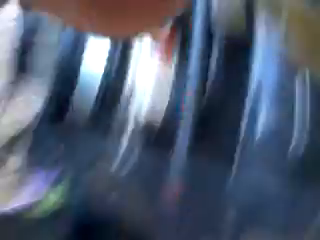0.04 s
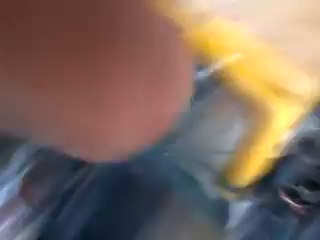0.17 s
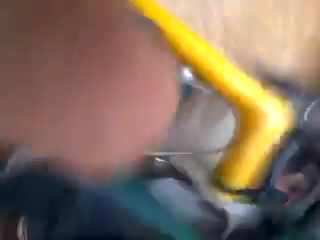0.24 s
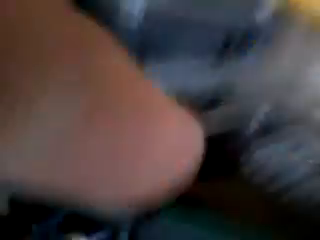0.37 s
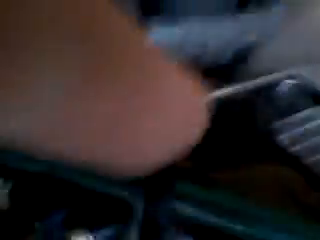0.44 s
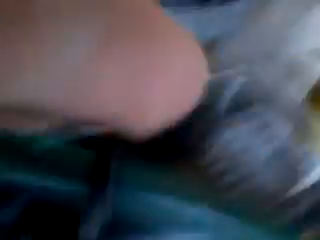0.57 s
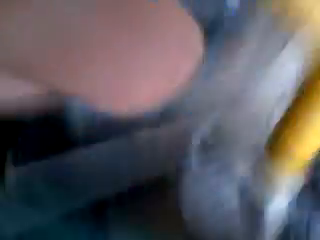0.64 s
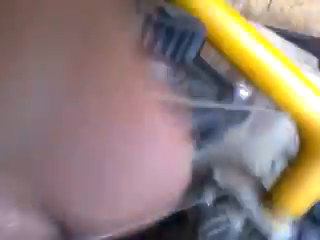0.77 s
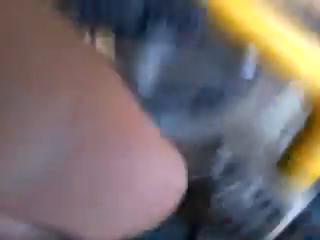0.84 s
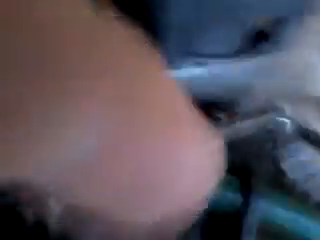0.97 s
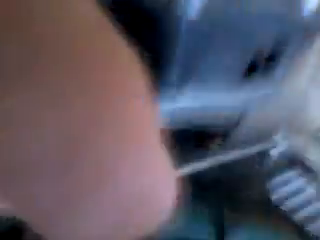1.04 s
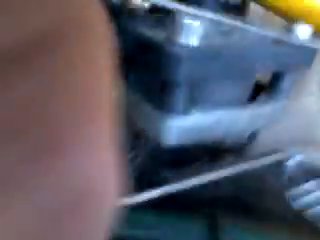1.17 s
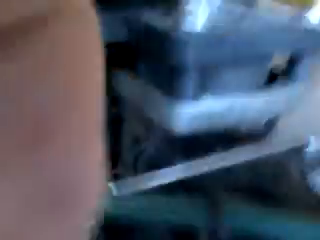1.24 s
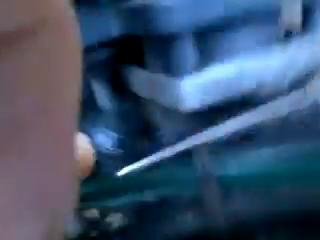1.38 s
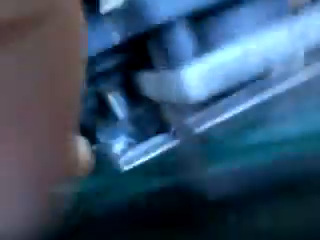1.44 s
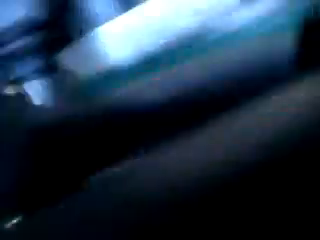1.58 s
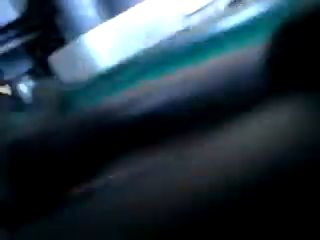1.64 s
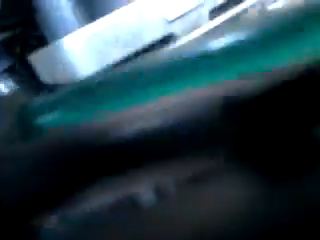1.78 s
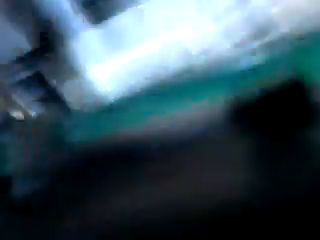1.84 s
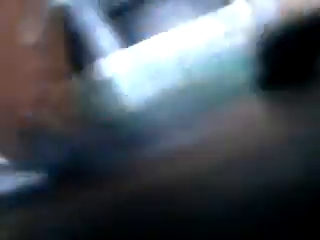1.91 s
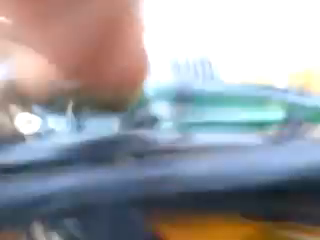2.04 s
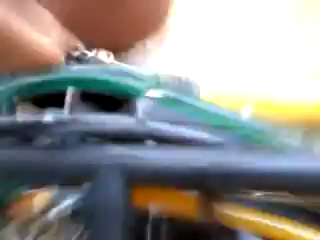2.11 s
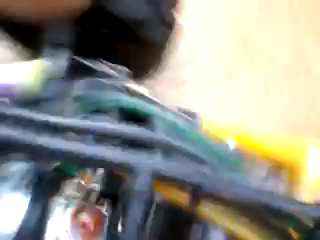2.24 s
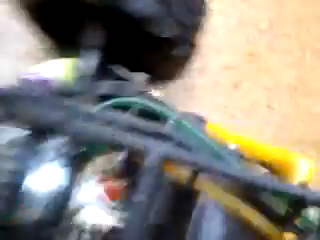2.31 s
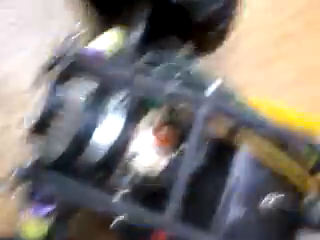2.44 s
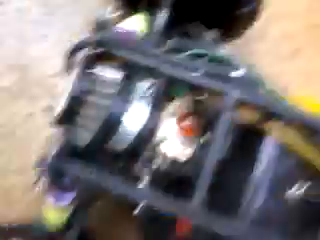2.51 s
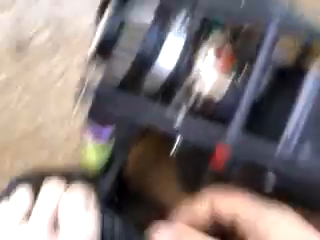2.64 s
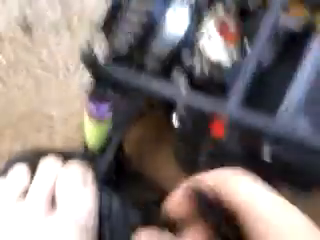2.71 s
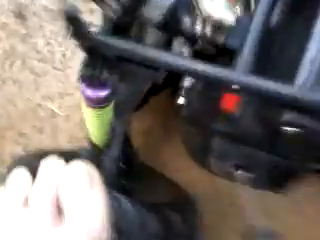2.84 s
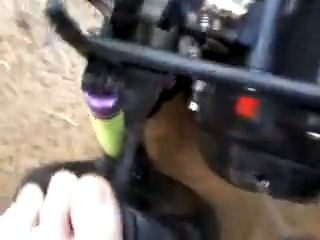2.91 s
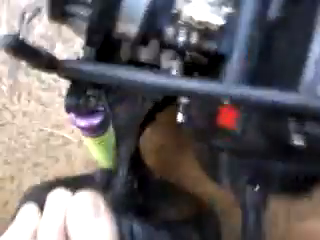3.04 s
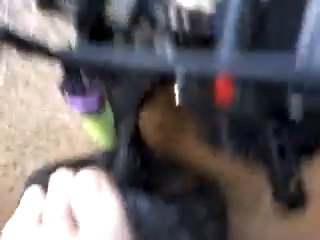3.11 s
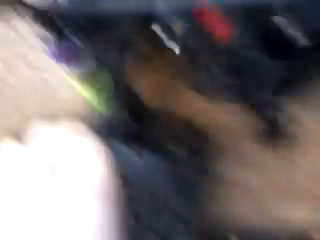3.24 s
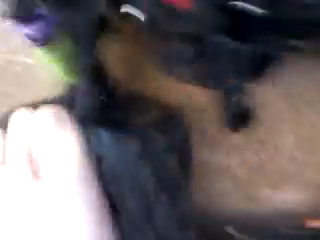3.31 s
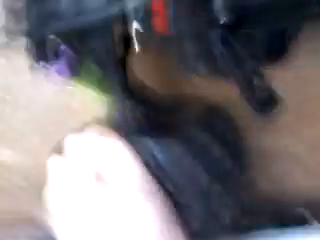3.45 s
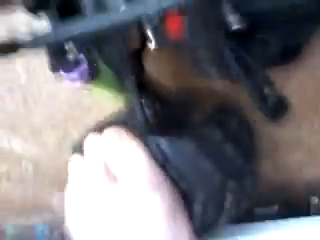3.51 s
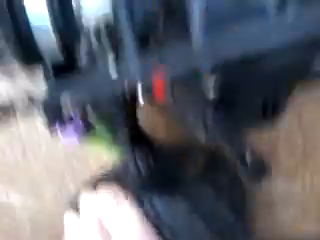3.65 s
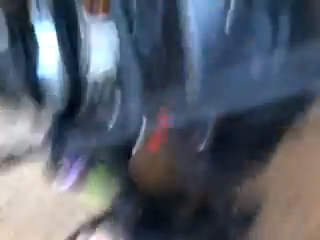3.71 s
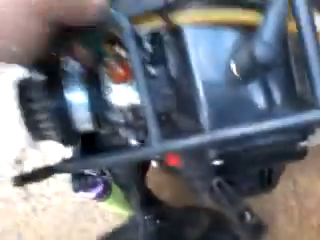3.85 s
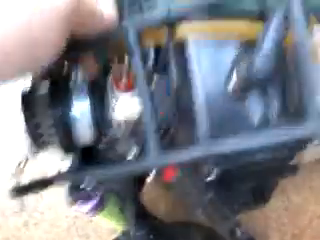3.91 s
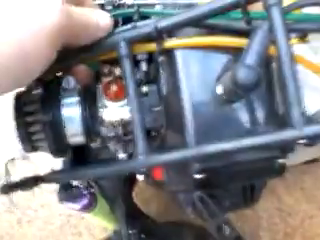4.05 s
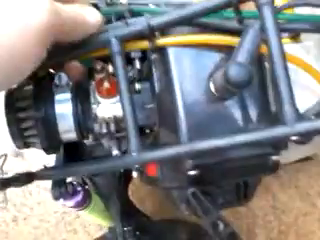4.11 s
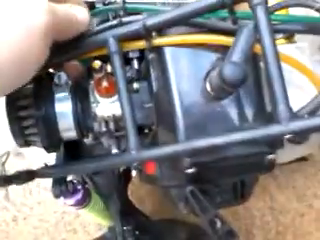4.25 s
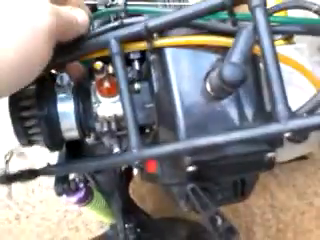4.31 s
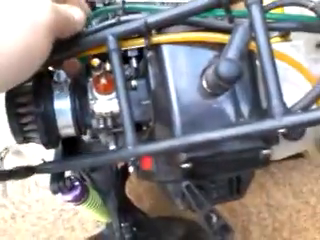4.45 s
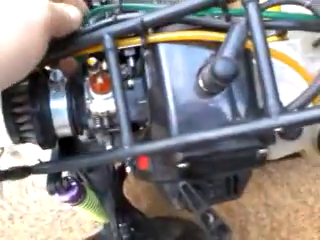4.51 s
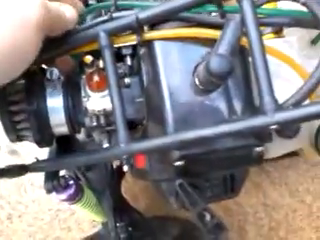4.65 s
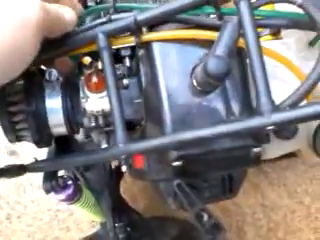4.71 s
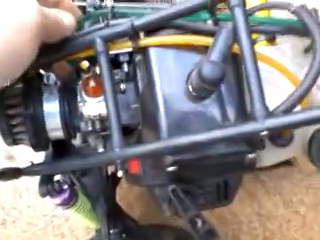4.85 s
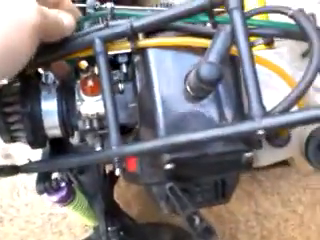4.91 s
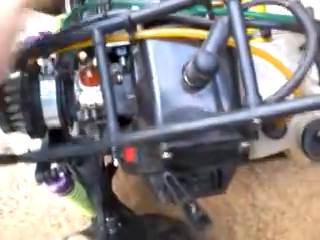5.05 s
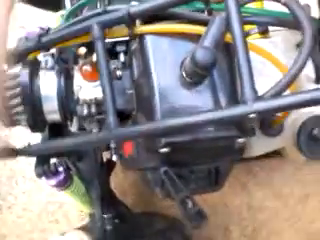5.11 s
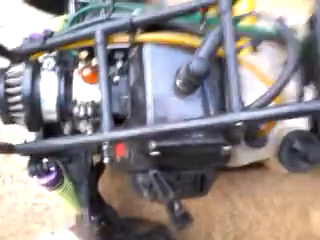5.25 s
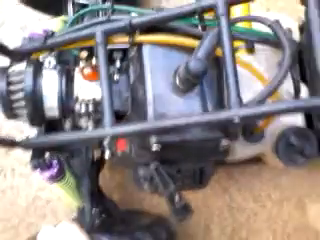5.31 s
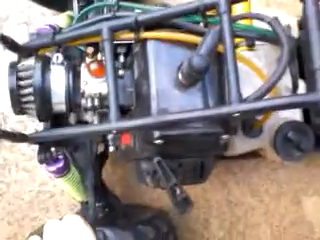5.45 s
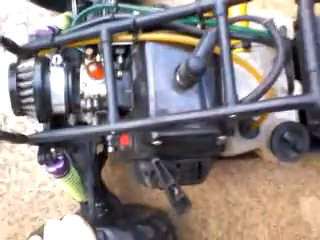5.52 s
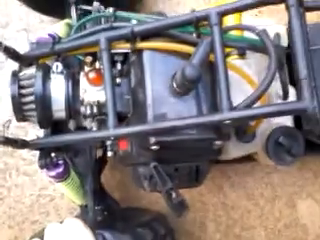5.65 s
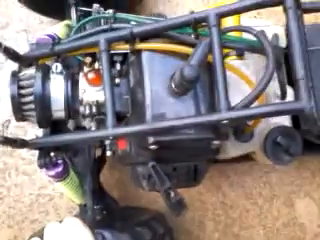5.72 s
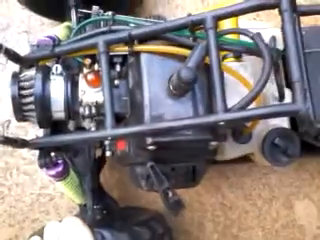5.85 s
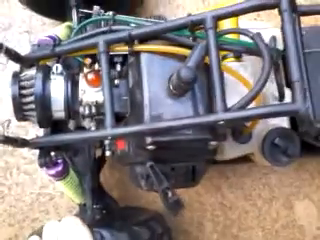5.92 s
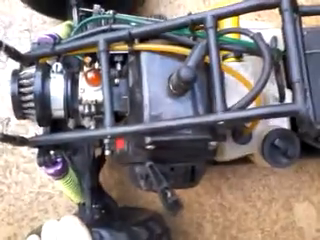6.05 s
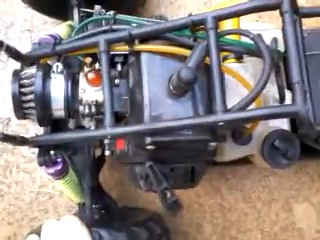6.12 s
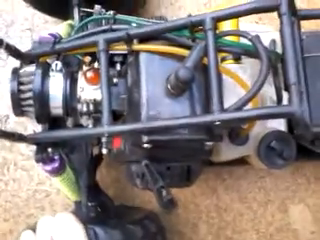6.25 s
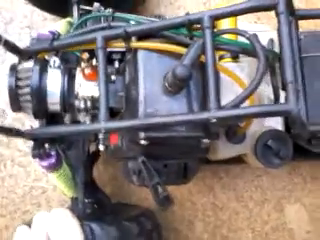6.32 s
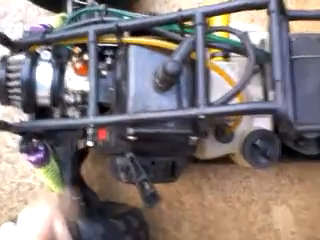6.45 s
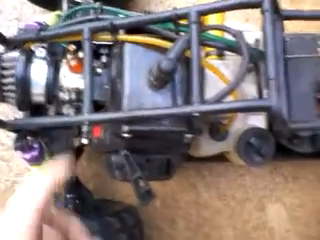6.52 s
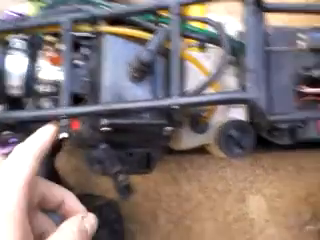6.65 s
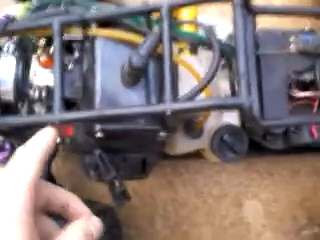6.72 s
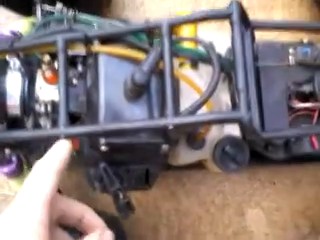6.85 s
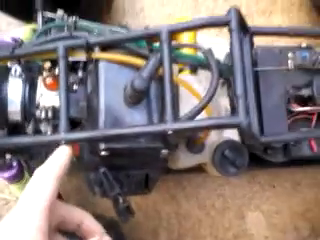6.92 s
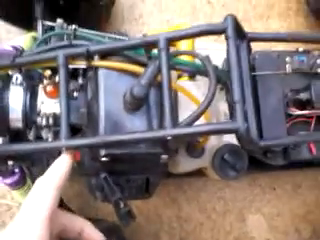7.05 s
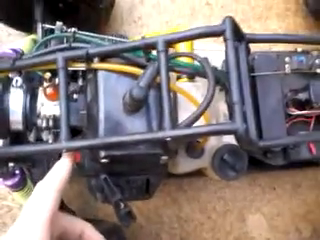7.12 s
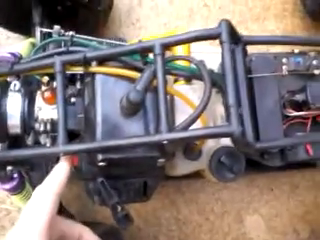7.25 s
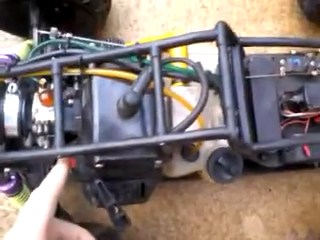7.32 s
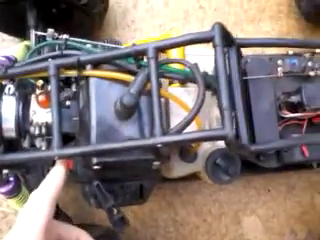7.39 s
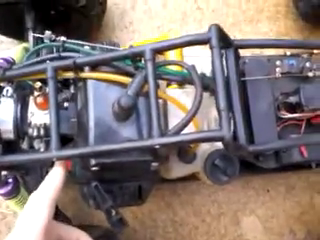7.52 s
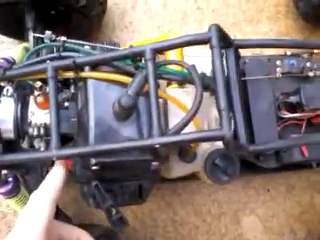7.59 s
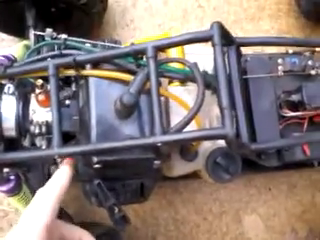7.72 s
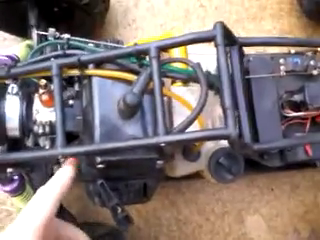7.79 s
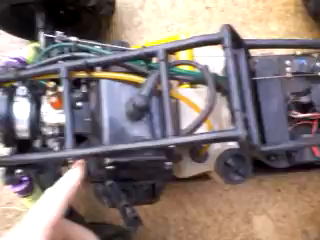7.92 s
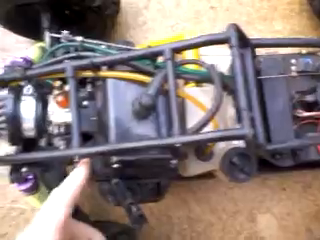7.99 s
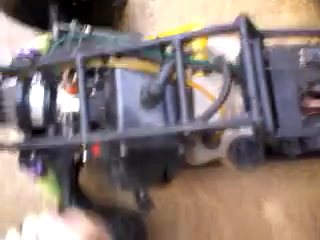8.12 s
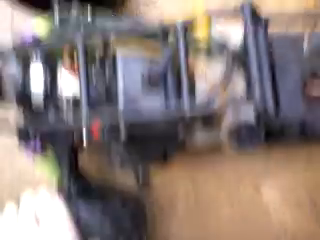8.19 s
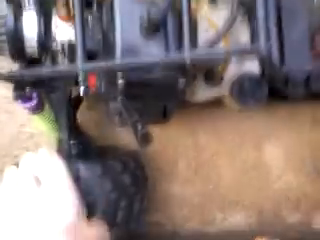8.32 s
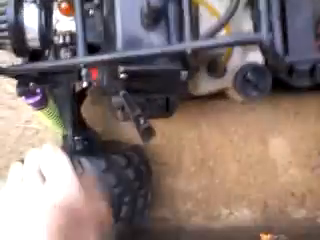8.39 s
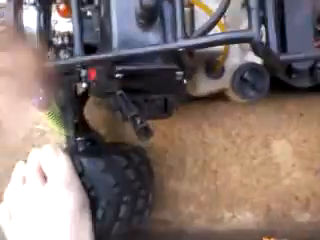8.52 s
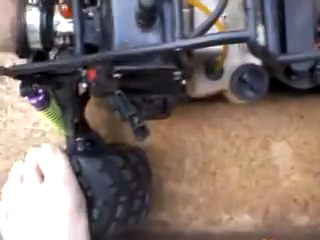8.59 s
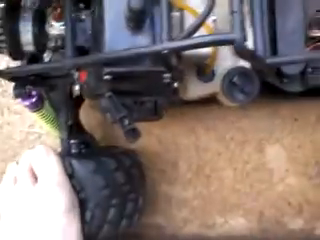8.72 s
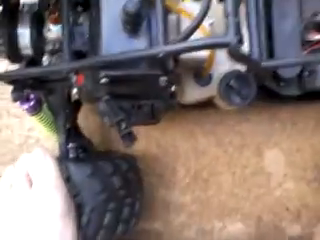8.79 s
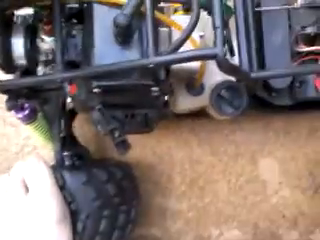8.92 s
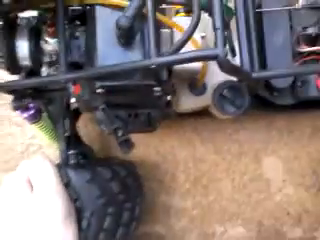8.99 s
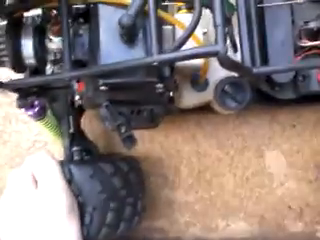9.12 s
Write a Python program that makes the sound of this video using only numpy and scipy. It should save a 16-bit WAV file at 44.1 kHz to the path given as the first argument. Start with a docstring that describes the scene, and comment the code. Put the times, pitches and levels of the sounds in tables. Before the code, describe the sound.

A small two-stroke model engine heard extremely close through a narrow, overloaded microphone. At the start a last low puff and a bump, then about two seconds of faint air with soft hand thumps and small metal clicks, a stronger thud near 1.5 and sharp clicks around 1.9. From 2.2 the pull starter clacks rapidly and the engine catches at 2.3, chugging, then revving up with harsh metallic clatter around 3 to 3.5, the level choking briefly. It sags at about 3.7 into a rough, booming lope with hard individual burns until 4.5, then climbs to a loud, raspy, honking drone by 5.4, becoming smoother and buzzier near 7. At 7.7 the spark is cut; the whir slides down and stalls just before 8. Clicks, a hollow puff or two and soft rattles follow, with a thin steel ring fading over quiet air to about 9.

```python
"""Right in front of a microphone, a toy truck's small two-stroke petrol engine is started and stopped.
After a last puff it is handled; the pull starter clacks, the engine catches, lopes, settles near
86 firings a second and is switched off. Each firing is an impulse that makes the pipe honk and the airbox
boom; filtered noise makes the gusts, clatter and air, and fading tones and noise make the metal clicks.
It is all far too loud for the microphone, which clips."""
import sys
import numpy as np
from scipy import signal
from scipy.fft import rfft, irfft, next_fast_len
from scipy.io import wavfile
from scipy.ndimage import uniform_filter1d, map_coordinates

SR = 44100
rng = np.random.default_rng(int(sys.argv[2]) if len(sys.argv) > 2 else 0)


def waveform_to_disk(signal):
    """Save audio, clipped to [-1, 1], as 16-bit WAV at the path in sys.argv[1]."""
    frames = np.transpose(np.atleast_2d(signal))
    scaled = np.clip(frames, -1, 1) * 32767
    samples = np.round(scaled).astype(np.int16)
    wavfile.write(sys.argv[1], SR, samples)


N = 403956  # length in samples


def amp(db):
    """Turn decibels into gain."""
    return 10 ** (np.asarray(db) / 20)


def unit(x):
    """Scale to rms 1."""
    return x / np.sqrt(np.mean(x ** 2) + 1e-20)


def curve(rows):
    """Join (time, value) points with straight lines, one value per sample."""
    s, values = np.transpose(rows)
    return np.interp(np.arange(N) / SR, s, values)


def filtered(x, response):
    """Multiply the spectrum of x by a response that depends on frequency."""
    m = next_fast_len(N + SR // 2)
    return irfft(rfft(x, m) * response(np.fft.rfftfreq(m, 1 / SR)), m)[:N]


def white():
    """Plain white noise."""
    return rng.standard_normal(N)


def noise(points):
    """Noise of rms 1, coloured by (f/Hz, level/dB) points."""
    f, db = np.transpose(points)
    return unit(filtered(white(), lambda hz: amp(np.interp(np.log(hz + 1), np.log(f), db))))


def resonate(x, modes):
    """Let x ring fixed resonances, each (f/Hz, width/Hz, level/dB)."""
    def response(f):
        return sum(amp(db) * 1j * f * w / (c * c - f * f + 1j * f * w) for c, w, db in modes)
    return filtered(x, response)


def levelled(x, seconds=.125):
    """Hold the rms near 1 over a short time."""
    power = np.abs(uniform_filter1d(x * x, int(seconds * SR)))
    return x / np.sqrt(power + 1e-6 * np.mean(x * x))


def decay(x, seconds):
    """Give every impulse an exponential tail."""
    return signal.lfilter([1], [1, -np.exp(-1 / (seconds * SR))], x)


def wobble(rate):
    """A smooth random curve with this many random points a second."""
    points = rng.standard_normal(int(N * rate / SR) + 4)
    return map_coordinates(points, [np.arange(N) * rate / SR])


def since(s):
    """Seconds since a moment, zero before it."""
    return np.maximum(np.arange(N) / SR - s, 0)


# background air: t/s, level/dB
AIR_LEVEL = [(0, -52.5), (1.95, -53.5), (2.1, -46), (8.2, -51), (8.55, -53.5), (8.85, -51.5), (9.16, -49)]
# colour of the air: f/Hz, level/dB
AIR_COLOUR = [(15, -63), (25, -34), (97, 0), (242, -7), (259, -9.5), (349, -4.5), (374, -9.5), (439, -5.5),
              (528, -11.5), (835, -4), (1780, -13), (2090, -7.5), (2240, -13.5), (3160, -19.5),
              (6000, -71.5), (7800, -107), (13200, -120)]
# thin steel ring: t/s, level/dB, hold/s, fade/(dB per s)
STEEL_RING = [(0, -57, 0, 12.5), (8.056, -46.5, 0.62, 29.5)]
RING_HZ, RING_RISE_S = 2126, 0.017


def background():
    """Quiet, slightly restless air as coloured noise, and a steel ring as a fading, wavering tone."""
    tone = np.sqrt(2) * np.sin(2 * np.pi * RING_HZ * np.arange(N) / SR)
    ring = tone * amp(3.6 * wobble(10))
    swell = sum(np.minimum(since(s) / RING_RISE_S, 1) * amp(db - fade * since(s + hold))
                for s, db, hold, fade in STEEL_RING)
    air = amp(curve(AIR_LEVEL) + 0.28 * wobble(37)) * noise(AIR_COLOUR)
    return air + swell * ring


# soft rattles of the handled chassis, starter rope and rocking crank: t/s of crest, level/dB, half length/s
RATTLES = [(0.003, -42, 0.051), (1.48, -59, 0.13), (2.133, -46, .05), (2.24, -29, 0.034),
           (8.042, -35.5, 0.065), (8.424, -50.5, 0.27)]
# colour of the rattles: f/Hz, level/dB
RATTLE_COLOUR = [(150, -18), (400, -6.5), (650, 0), (1400, -4.5), (2200, -1), (3200, -1.5), (3700, -13),
                 (4500, -52)]


def rattles():
    """Loose parts shiver: flickering noise in short swells."""
    t = np.arange(N) / SR
    swell = sum(amp(db) * np.exp(-((t - s) / half) ** 2) for s, db, half in RATTLES)
    return swell * amp(2 * wobble(120)) * noise(RATTLE_COLOUR)


# soft bumps of a hand on the chassis: t/s, level/dB, time to fall 60 dB/s
BUMPS = [(.005, -20, 0.055), (0.407, -42, .06), (.447, -46, .068), (.55, -45, .13), (.9, -44, .1),
         (1.374, -43, 0.4), (1.505, -25.5, 0.11), (1.56, -49, 0.55)]
# dull colour of a bump: f/Hz, level/dB
THUD_COLOUR = [(30, -25), (70, 5), (150, 6), (300, -6.5), (700, -16), (2000, -35)]
# clicks of handling, starter pawls and the rocking crank: t/s, level/dB
CLICKS = [(0.013, -30.5), (0.407, -35), (.446, -45), (.603, -42), (0.657, -42), (1.088, -37),
          (1.684, -31.5), (1.898, -31), (1.903, -14.5), (1.939, -26), (1.951, -8), (2.085, -33),
          (2.189, -20), (2.207, -7.5), (2.216, -8), (2.258, -8.5), (2.292, -10.5), (2.37, 0.5),
          (7.937, -26.5), (7.973, -23), (8.022, -23), (8.08, -31), (8.112, -21.5)]
# tones of the metal that the clicks ring: f/Hz, level/dB
METAL_TONES = [(800, -7), (1217, -5), (1335, 0), (1523, -4), (1647, -1), (1750, -3), (2105, -5), (2283, -9),
               (2789, -8), (3250, -6), (3500, -9)]
# colour of a click's crack: f/Hz, level/dB
CRACK_COLOUR = [(100, -11.5), (700, -10), (1200, 2), (1700, 7.5), (2600, -3), (3400, -10), (4200, -19.5),
                (5000, -65)]
CLICK_RING_S, CLICK_RISE_S = 0.055, .0007  # time to fall 60 dB; time constant of the onset


def metal_ring(t):
    """The metal's tones, with new strengths and phases for every click."""
    tones = 0
    for hz, level in METAL_TONES:
        gain = amp(level + rng.normal(0, 1.5))
        tones = tones + gain * np.sin(2 * np.pi * hz * t + rng.uniform(0, 2 * np.pi))
    return unit(tones)


def knocks():
    """Clicks crack and ring the metal; bumps are dull, toneless bursts of noise."""
    out, t = np.zeros(N + SR), np.arange(SR // 3) / SR
    crack, thud = noise(CRACK_COLOUR), noise(THUD_COLOUR)
    # a quick fade with a quieter, longer tail under it
    fade = amp(-60 * t / CLICK_RING_S) + amp(-27 - 60 * t / .17)
    click_shape = fade * (1 - np.exp(-t / CLICK_RISE_S))
    for s, db in CLICKS:
        at = int(s * SR)
        click = 0.18 * metal_ring(t) + 0.88 * crack[at:at + len(t)]
        out[at:at + len(t)] += amp(db) * click_shape * click
    for s, db, t60 in BUMPS:
        at = int(s * SR)
        shape = amp(-60 * t / t60) * (1 - np.exp(-t / 0.00059))
        out[at:at + len(t)] += amp(db) * shape * thud[at:at + len(t)]
    # keep about 50 to 3900 Hz
    return filtered(out[:N], lambda hz: 1 / (1 + (hz / 3900) ** 24) - 1 / (1 + (hz / 50) ** 8))


# slow piston strokes through the airbox: t/s of crest, level/dB, half length/s, f/Hz
PUFFS = [(0, -23.5, 0.062, 141), (2.275, -10, 0.0094, 153), (8.036, -7.5, 0.0032, 160),
         (8.074, -20.5, 0.035, 125), (8.137, -17.5, 0.016, 145), (8.19, -42, 0.035, 139)]


def puffs():
    """The slowly turning piston makes the airbox hum: short swells of a low tone."""
    t = np.arange(N) / SR
    return sum(amp(db) * np.exp(-((t - s) / half) ** 2) * np.sin(2 * np.pi * hz * (t - s))
               for s, db, half, hz in PUFFS)


# the engine catches, the spark is cut, the crank stalls
CATCH_S, CUT_S, STALL_S = 2.3, 7.72, 7.975
CATCH_RISE_S, CUT_FADE_S, STALL_FADE_S = 0.0077, 0.048, 0.02
COAST_S = .255  # the unpowered crank loses speed with this time constant
# crank speed before the coasting slows it: t/s, speed/(revolutions per s)
DRIVEN_SPEED = [(2.25, 39), (2.52, 41), (2.65, 45), (3.0, 64), (3.2, 68), (3.5, 67), (3.7, 59),
                (3.95, 54.5), (4.2, 56), (4.7, 71.5), (5.0, 78.5), (5.38, 86), (5.9, 86.3), (6.15, 87.7),
                (6.79, 87.6), (6.88, 85.5), (7.2, 81.3), (7.5, 83), (7.72, 82)]


def speed():
    """Revolutions per second: driven until the spark is cut, then slowed by friction."""
    return curve(DRIVEN_SPEED) * np.exp(-since(CUT_S) / COAST_S)


def spark_off():
    """Goes from 0 to 1 as the burning stops."""
    return np.minimum(since(CUT_S) / CUT_FADE_S, 1)


def turning():
    """Gain that opens as the engine catches and closes as it stalls."""
    before = np.maximum(CATCH_S - np.arange(N) / SR, 0)
    return np.exp(-before / CATCH_RISE_S - since(STALL_S) / STALL_FADE_S)


# tones of the whirring crank: multiple of crank speed, level/dB
WHIR_ORDERS = [(2, -3.5), (4, 1), (7, -0.5)]
WHIR_DB, WHIR_GROWS_DB_PER_S = -21, 29


def coasting():
    """With the spark cut, tones at multiples of the crank speed slide down in pitch."""
    revs = np.cumsum(speed()) / SR
    whir = sum(amp(db) * np.sin(2 * np.pi * order * revs) for order, db in WHIR_ORDERS)
    level_db = WHIR_DB + WHIR_GROWS_DB_PER_S * (since(CUT_S) - since(STALL_S)) + 2.5 * wobble(60)
    # remove the lows below about 105 Hz
    return filtered(spark_off() * turning() * amp(level_db) * whir,
                    lambda hz: 1 - 1 / (1 + (hz / 105) ** 8))


def firings(revs, rough, jitter_s, scatter_db):
    """One impulse a revolution; rough burning scatters time and strength."""
    at = np.flatnonzero(np.diff(np.floor(revs)))
    chance = rng.standard_normal((len(at), 2)).clip(-2, 2) * rough[at, None]
    late = (chance[:, 0] * jitter_s * SR).astype(int)
    return np.bincount(np.clip(at + late, 0, N - 1), amp(scatter_db * chance[:, 1]), N)


# extra hard single burns, mostly while it lopes: t/s, level/dB
HARD_BURNS = [(2.428, -20.5), (2.465, -10.5), (2.541, -18.5), (2.654, -5.5), (2.736, -10.5), (3.64, -21),
              (3.746, -6.5), (3.813, -9), (3.888, -7.5), (3.977, -11), (4.048, -7.5), (4.118, -6.5),
              (4.186, -8.5), (4.256, -11.5), (4.329, -6.5), (4.394, -9.5), (4.511, -19), (4.56, -17),
              (5.686, -8)]


def bangs(seconds):
    """Envelope of the hard single burns, each with an exponential tail."""
    s, db = np.transpose(HARD_BURNS)
    return decay(np.bincount((s * SR).astype(int), amp(db), N), seconds)


# airbox resonances: f/Hz, width/Hz, level/dB
AIRBOX_MODES = [(148, 24, 0), (235, 50, -17)]
KICK = 1.5  # how hard a single burn strikes the airbox


def airbox_boom(blows, swirl):
    """The intake gulps every revolution, burning or not, and rings the airbox."""
    gulps = levelled(blows + KICK * bangs(seconds=0.00024))
    ringing = resonate(gulps + .45 * swirl, AIRBOX_MODES)
    return levelled(resonate(ringing, [(168.0, 126, 0)]), seconds=0.022)


# resonances of crankcase and cooling fins: f/Hz, width/Hz, level/dB
CASE_MODES = [(1080, 80, -5), (1260, 70, -1), (1730, 70, -3), (1880, 70, -4), (2505, 80, 2),
              (3230, 140, -7)]
# colour of the clatter: f/Hz, level/dB
CLATTER_COLOUR = [(300, -7.5), (750, 3), (1250, 2), (1600, -2.5), (2100, -1), (2520, 0), (2850, -5.5),
                  (3250, -5), (3700, -11), (4200, -27.5), (5000, -74.5)]


def metal_clatter(blows, flow, rough, clatter_db):
    """The metal shakes on between the blows; hard shaking brings out the ring of the fins."""
    shake = levelled(flow + 6.6) * amp(2.17 * wobble(90) + 0.77 * wobble(24))
    case = levelled(resonate(shake * white() * rough + 0.022 * levelled(blows), CASE_MODES))
    return levelled(shake * noise(CLATTER_COLOUR) + amp(1.5 + 0.58 * clatter_db) * case)


# colour of each stroke's bark: f/Hz, level/dB
BARK_COLOUR = [(200, -20.5), (450, 8.5), (750, -7.5), (1200, -9.5), (2000, -12.5), (4000, -40.5)]
STROKE_DB, STROKE_S = -17, .004  # level at half speed with the spark on; decay time constant


def stroke_barks(blows, slow, off):
    """At low speed each stroke is heard as a short bark of noise."""
    bursts = levelled(decay(decay(blows, STROKE_S), .001))
    gain = amp(STROKE_DB) * np.clip(slow, 0, 1) ** 2 * (1 - 0.35 * off)
    return gain * bursts * noise(BARK_COLOUR)


def pipe(x, hz, width_hz):
    """A resonance whose pitch moves."""
    turn = np.exp(2j * np.pi * np.cumsum(hz) / SR)
    return (decay(x / turn, 1 / (np.pi * width_hz)) * turn).real


# middle pitch of the exhaust pipe: t/s, f/Hz
PIPE_PITCH = [(3.55, 695), (3.9, 590), (4.5, 575), (5.0, 606), (6.2, 616), (7.71, 618), (7.76, 530),
              (7.83, 615)]
SWEEP = 0.27  # rise of the pipe's pitch over one fully rough revolution, as a share
# silencer resonances: f/Hz, width/Hz, level/dB
SILENCER_MODES = [(456, 22, 1), (548, 40, -4), (690, 70, -6), (745, 35, -6)]
# resonances of the pipe's mouth: f/Hz, width/Hz, level/dB
MOUTH_MODES = [(784, 120, 6), (960, 190, -1), (1280, 130, -2.5), (1845, 60, 0.5), (2510, 110, -4)]
BUZZ_DB = -17.5  # relative to the exhaust, when the burning is even
# colour of the gas gusts: f/Hz, level/dB
GUST_COLOUR = [(15, -22), (30, -22.5), (70, -22.5), (130, 5), (240, 4), (350, -1.5), (500, 2), (900, -14.5),
               (2000, -45.5)]
APART = 0.8  # how far the exhaust falls silent between slow strokes


def exhaust_blast(blows, flow, swirl, revs, rough, slow):
    """Pulses of gas honk in the pipe, sing in the silencer, buzz at the mouth and blow gusts."""
    pulses = levelled(blows)
    # the moving piston sweeps the pipe's pitch upward once a revolution
    sweep = 1 + SWEEP * rough * (2 * (revs % 1) - 1) / 2
    honk = levelled(pipe(pulses + 1.39 * swirl, curve(PIPE_PITCH) * sweep, width_hz=23), seconds=0.031)
    # turbulent gas sings in the silencer's fixed chambers
    chambers = resonate(flow * white(), SILENCER_MODES)
    body = levelled(resonate(chambers, [(525, 175, 0)]))
    # the sharp edge of each pulse buzzes in the pipe's mouth
    mouth = levelled(resonate(pulses + 0.45 * swirl, MOUTH_MODES))
    buzz = amp(BUZZ_DB) * (1 - 0.76 * rough) * mouth
    gust = amp(-7) * np.sqrt(np.abs(rough)) * flow * noise(GUST_COLOUR)
    voice = levelled(honk + (0.05 + 1.08 * rough ** 2) * body, seconds=0.078)
    exhaust = voice * amp(0.94 * wobble(45)) + gust + buzz
    # at low speed the strokes stand apart
    return exhaust * (np.abs(flow) + .05) ** (APART * np.clip(slow, 0, 1) ** 2)


# unevenness of combustion: t/s, roughness (limited to 0-1)
ROUGHNESS = [(2.9, 0.77), (3.4, 1.04), (4.1, 0.78), (4.8, 0.59), (5.7, 0.57), (6.7, 0.48), (7.15, .14),
             (7.7, 0.15), (7.82, 0.64)]
# clatter before the spark-off change, peaking as the engine first revs up: t/s, level/dB
CLATTER_LEVEL = [(2.3, -17), (2.38, -13.5), (2.5, -21), (2.75, -17), (2.95, -8.5), (3.15, -5.5),
                 (3.28, -11.5), (3.52, -12), (3.72, -25.5), (4.1, -23.5), (4.35, -19), (5.4, -14.5),
                 (5.56, -10.5), (5.72, -14), (6.15, -11), (7.55, -14.5), (7.7, -10)]
IDLE_HZ = 86
# levels at idle, and their change at half speed: a slow crank booms more and blows less
EXHAUST_DB, EXHAUST_SLOW_DB = -4.5, -10.5
BOOM_DB, BOOM_SLOW_DB = -18.5, 11
CUT_EXHAUST_DB, CUT_BOOM_DB, CUT_CLATTER_DB = -1, -3, -17.5  # change once nothing burns
SURGE = 4  # how far a hard burn lifts the boom and clatter


def engine():
    """Each revolution rings the pipe and airbox, blows a gust of gas and shakes the metal."""
    rate, off = speed(), spark_off()
    slow = 2 * (1 - rate / IDLE_HZ)  # 0 at idle, 1 at half speed
    exhaust_db = EXHAUST_DB + EXHAUST_SLOW_DB * (IDLE_HZ / rate - 1) + CUT_EXHAUST_DB * off
    boom_db = BOOM_DB + BOOM_SLOW_DB * slow + CUT_BOOM_DB * off + 0.89 * wobble(9.7)
    clatter_db = curve(CLATTER_LEVEL) + CUT_CLATTER_DB * off

    rough = np.clip(curve(ROUGHNESS), 0, 1)
    revs = np.cumsum(rate * (1 + 0.02012 * rough * wobble(25))) / SR
    blows = firings(revs, rough, jitter_s=.0003, scatter_db=1.0)
    flow = levelled(decay(decay(blows, 0.0072), 0.0025))  # the port opens and empties gradually
    swirl = rough * flow * white()

    exhaust = amp(exhaust_db) * exhaust_blast(blows, flow, swirl, revs, rough, slow)
    strokes = stroke_barks(blows, slow, off)
    boom = amp(boom_db) * airbox_boom(blows, swirl)
    clatter = amp(clatter_db) * metal_clatter(blows, flow, rough, clatter_db)
    # each hard burn barks, and the boom and clatter surge after it
    burns = bangs(seconds=0.023) * (0.48 * noise(CLATTER_COLOUR) + 0.92 * noise(GUST_COLOUR))
    surge = levelled(1 + SURGE * bangs(seconds=0.016), seconds=.15)
    return turning() * (exhaust + strokes + surge * (boom + clatter)) + burns


def scene():
    """Everything that reaches the microphone, added up."""
    return (background() + rattles() + knocks() + puffs() + coasting() + engine())[None]


# moments when the overloaded microphone chokes and the level dips briefly: t/s, length/s, level/dB
CHOKES = [(2.903, 0.015, -17), (3.071, 0.013, -13.5), (3.107, 0.022, -18.5), (3.201, 0.014, -12),
          (3.435, 0.013, -9), (3.475, 0.013, -15), (3.527, 0.02, -9), (5.429, 0.015, -11),
          (5.483, 0.014, -13), (5.644, 0.018, -13.5), (5.993, 0.013, -11.5), (6.428, 0.018, -15.5),
          (7.565, .012, -14), (7.616, 0.013, -13)]
TOP_HZ = 15850


def record(dry):
    """A narrow-band microphone that chokes at set moments, clips hard and loses the very top."""
    t = np.arange(N) / SR
    dips_db = sum(depth * np.exp(-np.minimum(np.abs(2 * (t - s) / length), 10) ** 4)
                  for s, length, depth in CHOKES)
    narrow = filtered(dry[0] * amp(dips_db), lambda hz: 1 / (1 + (hz / 4100) ** 24))
    clipped = np.clip(narrow, -.71, .71)
    return filtered(clipped, lambda hz: hz < TOP_HZ)[None]


dry = scene()
out = record(dry)
waveform_to_disk(out)
```